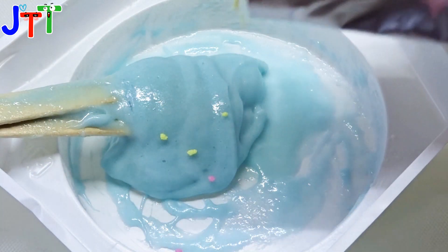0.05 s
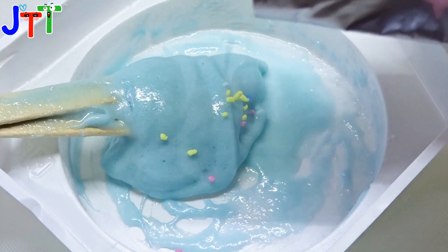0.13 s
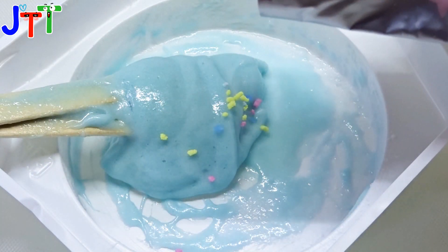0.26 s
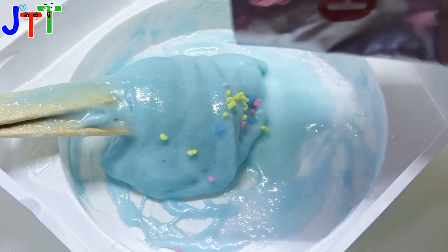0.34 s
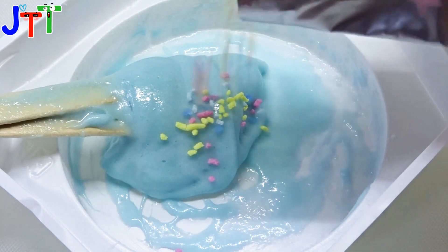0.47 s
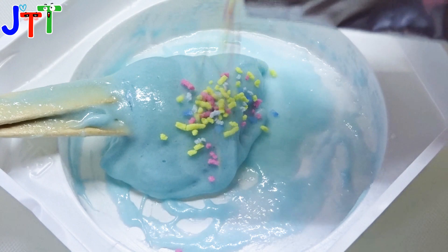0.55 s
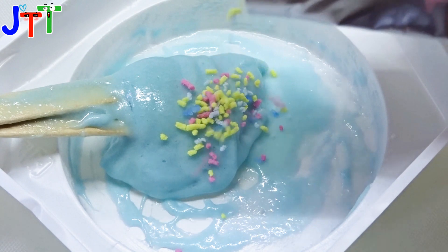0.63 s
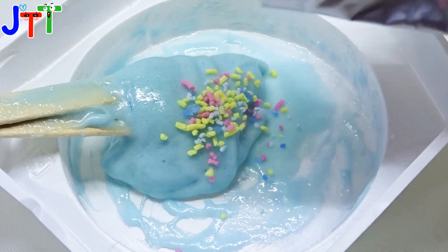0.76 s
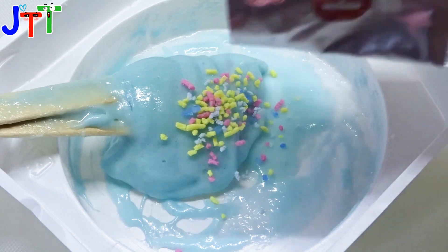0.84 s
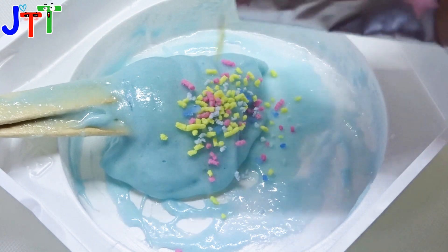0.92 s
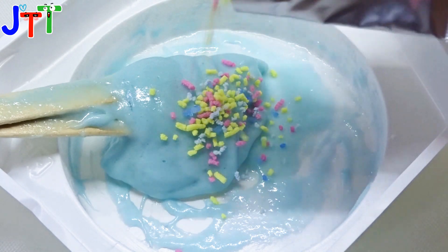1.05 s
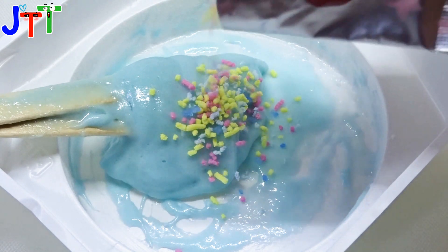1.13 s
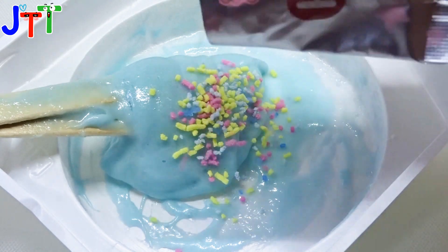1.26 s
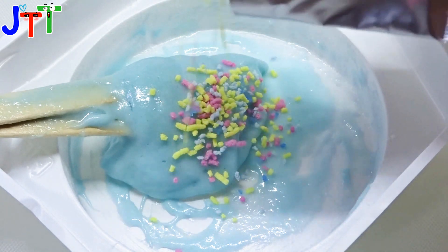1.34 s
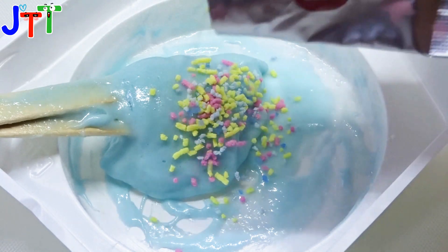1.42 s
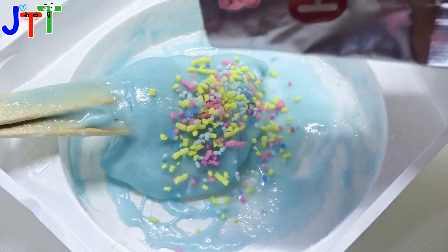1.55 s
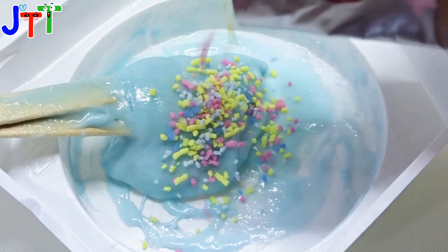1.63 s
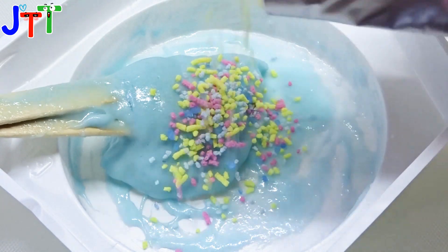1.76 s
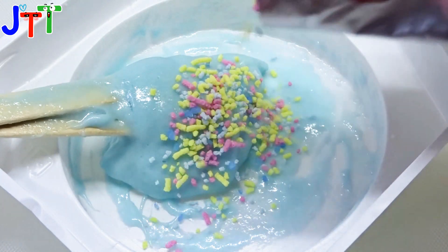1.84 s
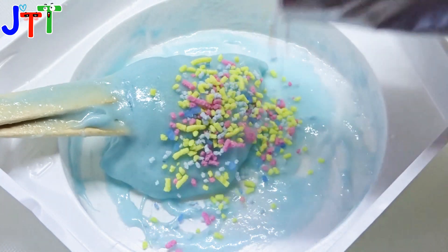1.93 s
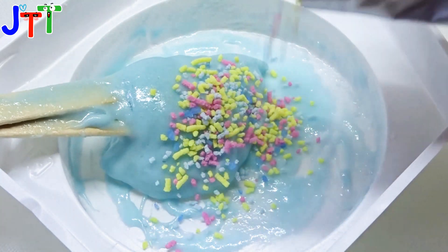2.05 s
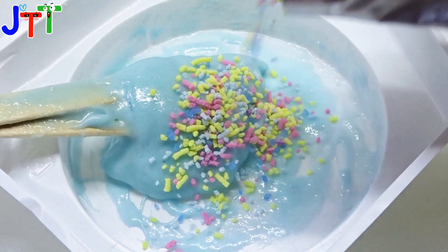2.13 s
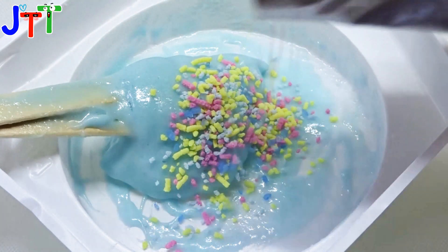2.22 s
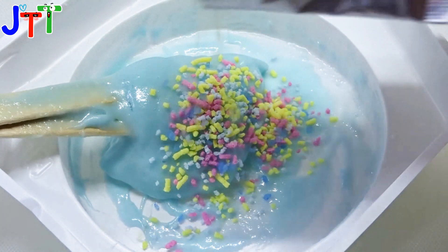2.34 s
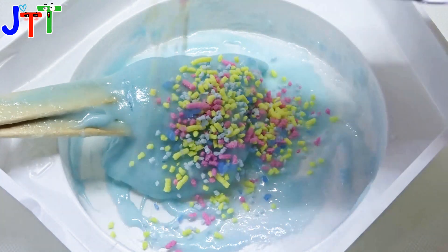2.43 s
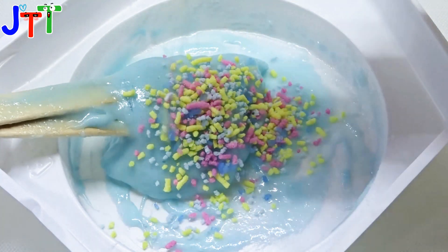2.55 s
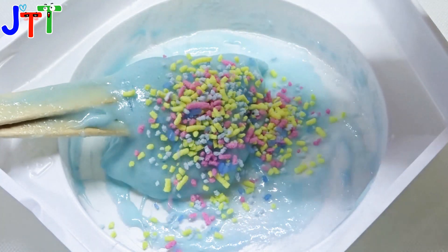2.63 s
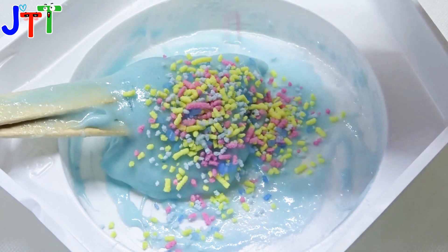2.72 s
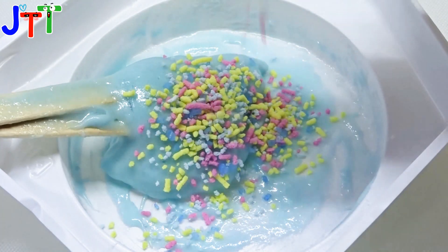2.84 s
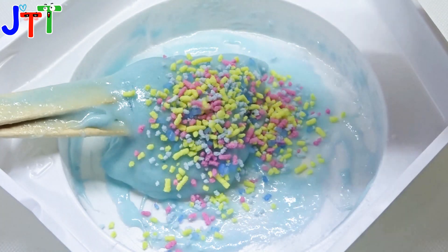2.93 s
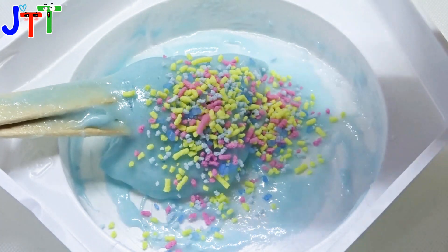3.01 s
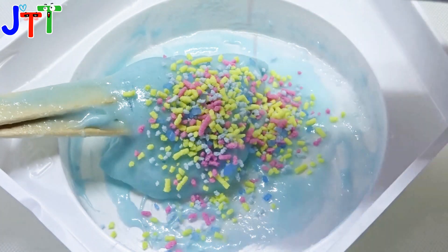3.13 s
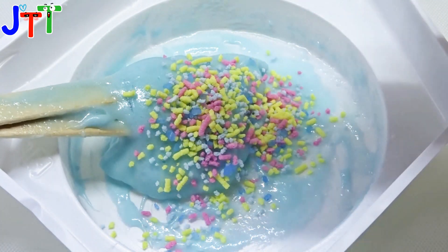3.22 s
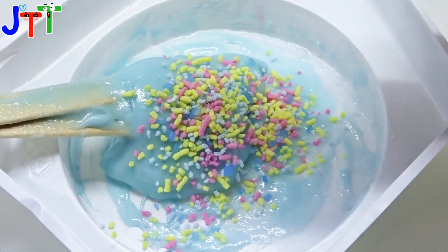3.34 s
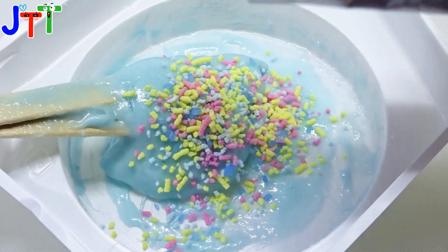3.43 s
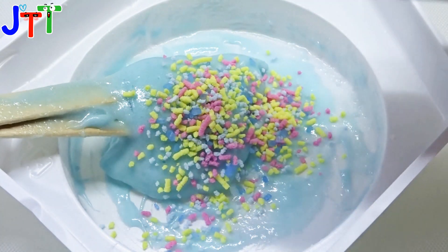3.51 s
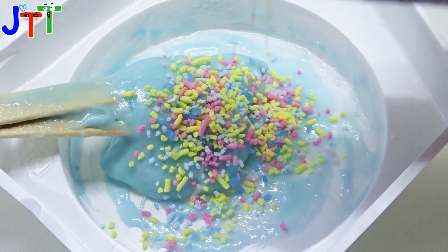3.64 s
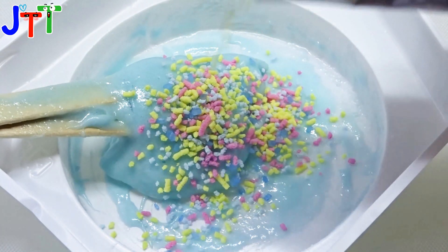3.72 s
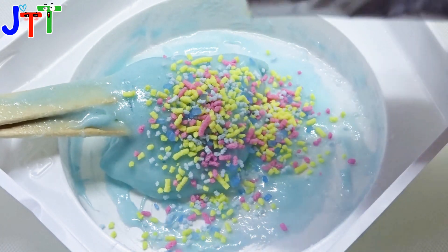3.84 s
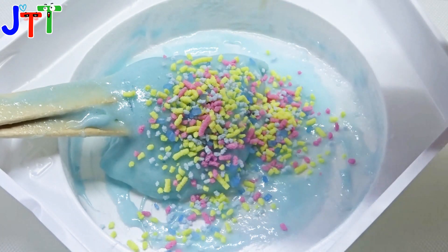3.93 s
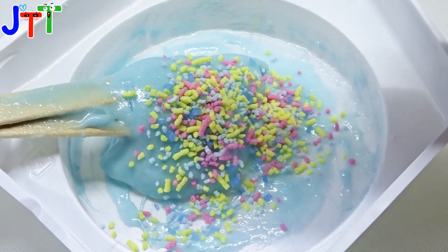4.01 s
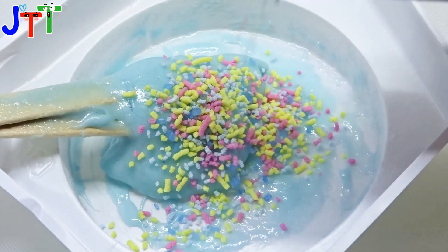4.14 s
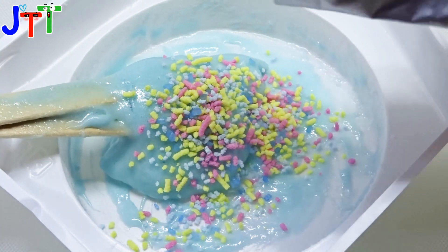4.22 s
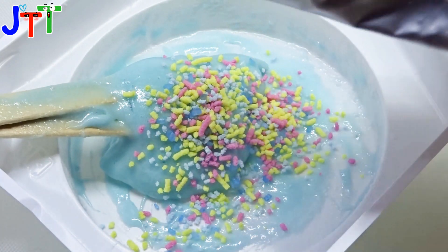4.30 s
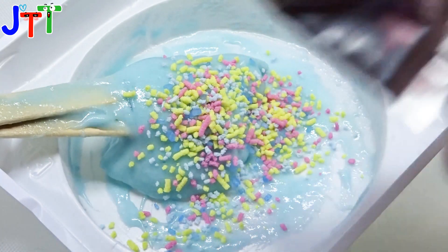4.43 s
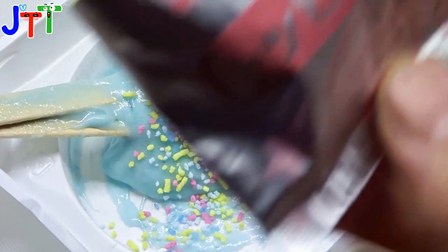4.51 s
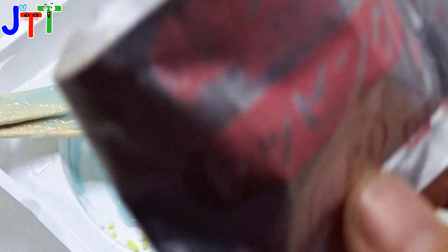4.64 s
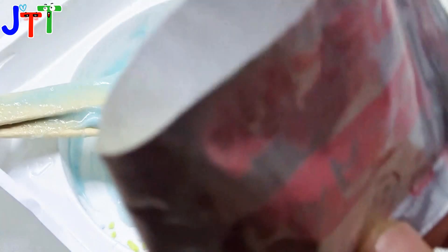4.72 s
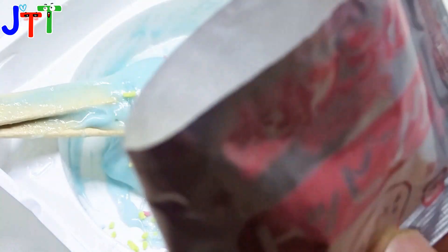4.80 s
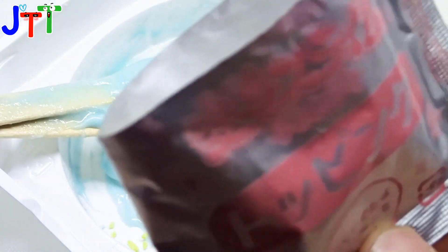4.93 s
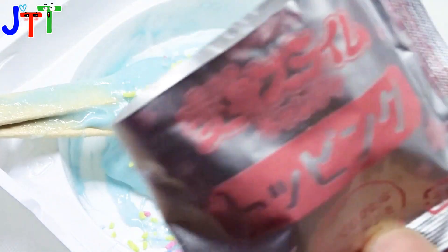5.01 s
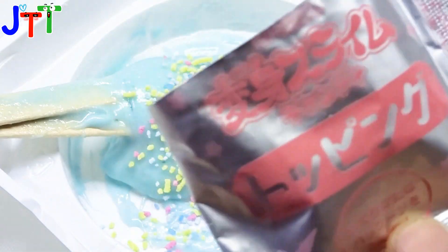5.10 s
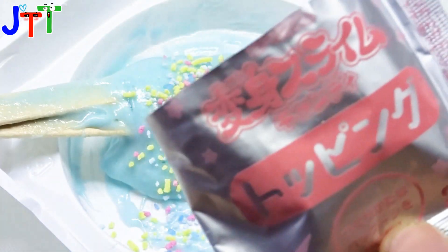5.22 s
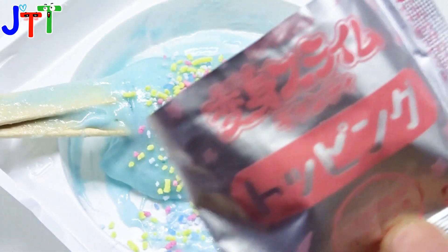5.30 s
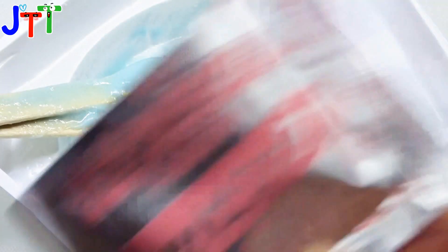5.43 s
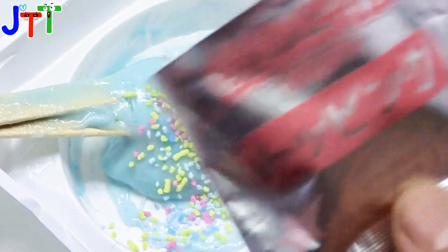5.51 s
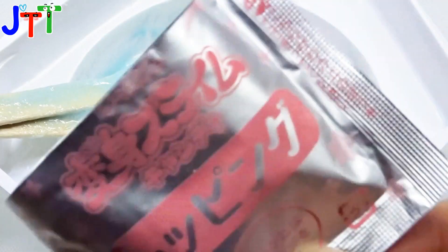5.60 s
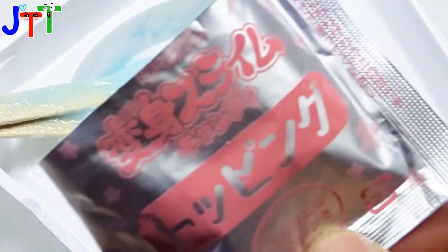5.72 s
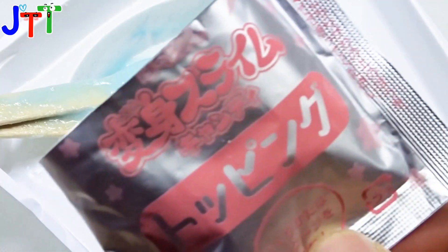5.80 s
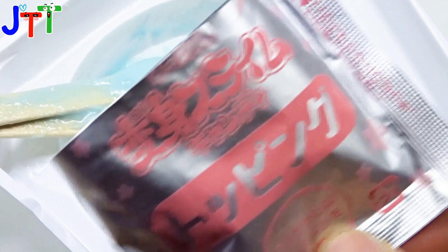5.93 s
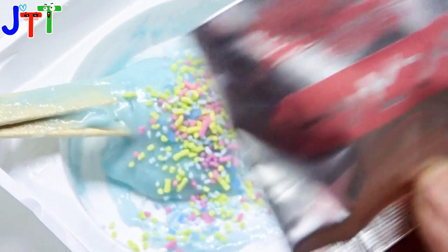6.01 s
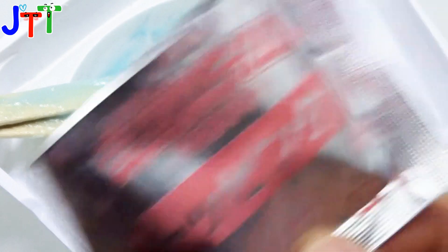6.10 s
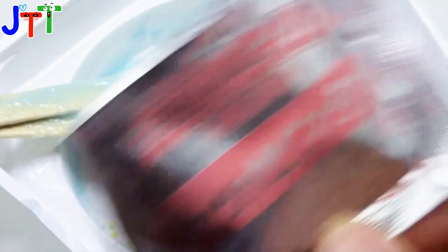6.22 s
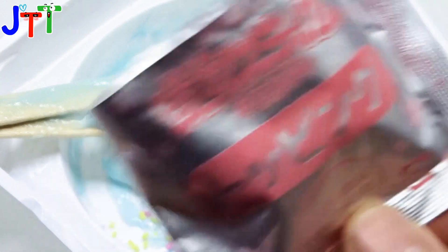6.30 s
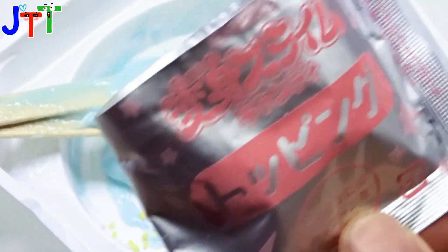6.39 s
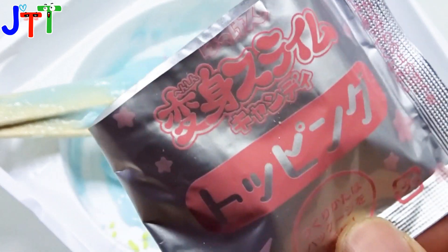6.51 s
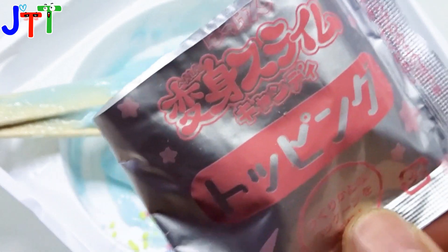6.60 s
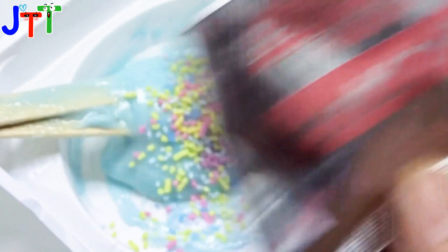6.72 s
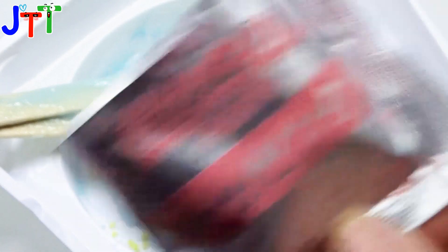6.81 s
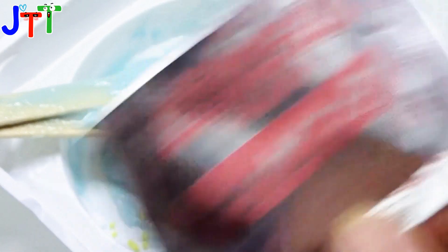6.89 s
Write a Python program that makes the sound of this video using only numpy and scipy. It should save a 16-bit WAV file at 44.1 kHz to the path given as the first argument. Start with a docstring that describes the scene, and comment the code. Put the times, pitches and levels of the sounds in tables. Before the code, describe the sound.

Fine dry grains hiss and patter over thin foil, jog after jog, dotted with tiny creasing snaps. Soft hand thuds come through the table as the packet is flipped and its contents slide. Then sharp rattling shakes burst out with short gaps between them, the last cut off at the end. Close, dry stereo, small room, faint low hum and air.

```python
"""Sugar sprinkles in a foil packet

A foil packet of sugar sprinkles is tipped over a tray close to a stereo microphone, turned over, then shaken.
Grains are random clicks through a bank of short modes, their level following each rush; creases snap as
fast-dying bands of noise. Dull noise puffs ring the table; a small room, a wavering hum and air lie below.
"""
import sys
import numpy as np
from scipy import signal
from scipy.fft import rfft, irfft, next_fast_len
from scipy.io import wavfile

SR = 44100
rng = np.random.default_rng(int(sys.argv[2]) if len(sys.argv) > 2 else 0)


def wav_out(sig):
    """Save sig, one row per channel (or a flat mono array), as 16-bit PCM at SR to the path in sys.argv[1]."""
    wavfile.write(sys.argv[1], SR, np.round(np.clip(np.atleast_2d(sig).T, -1, 1) * 32767).astype(np.int16))


N = 306578   # length in samples

POURING_S, TURNING_S, SHAKING_S = (0, 4.6), (4.4, 5.4), (5.4, 7)   # start and end of each stage


def pour():
    """Each jog of the tipped packet lets a rush of grains slide over the foil."""
    # Each row: peak time in seconds, relative level in dB, rise and fall in seconds for 10 dB.
    jogs = [(0.067, -53.0, 0.046, 0.056), (0.177, -35.5, 0.025, 0.066), (0.3, -45.0, 0.055, 0.041),
            (0.375, -54.5, 0.025, 0.138), (0.514, -35.0, 0.021, 0.074), (0.646, -44.5, 0.051, 0.043),
            (0.775, -52.5, 0.111, 0.052), (0.9, -53.0, 0.141, 0.019), (0.977, -38.0, 0.039, 0.112),
            (1.162, -44.5, 0.05, 0.065), (1.287, -48.0, 0.038, 0.1), (1.486, -43.0, 0.083, 0.04),
            (1.583, -43.0, 0.046, 0.085), (1.709, -41.5, 0.018, 0.101), (1.862, -42.5, 0.029, 0.127),
            (1.995, -43.0, 0.025, 0.092), (2.082, -54.5, 0.007, 0.15), (2.203, -42.5, 0.15, 0.033),
            (2.279, -43.5, 0.054, 0.09), (2.405, -46.0, 0.033, 0.137), (2.475, -46.0, 0.031, 0.021),
            (2.525, -42.0, 0.019, 0.136), (2.611, -44.5, 0.016, 0.023), (2.685, -48.5, 0.125, 0.143),
            (2.791, -48.5, 0.043, 0.105), (2.947, -49.5, 0.049, 0.046), (3.084, -52.5, 0.092, 0.048),
            (3.205, -49.0, 0.04, 0.078), (3.318, -45.5, 0.018, 0.114), (3.471, -50.5, 0.046, 0.027),
            (3.519, -45.0, 0.028, 0.023), (3.598, -46.5, 0.047, 0.104), (3.666, -46.0, 0.071, 0.012),
            (3.774, -52.5, 0.15, 0.061), (3.831, -53.0, 0.007, 0.15), (3.945, -54.0, 0.116, 0.022),
            (3.983, -42.0, 0.013, 0.124), (4.156, -50.5, 0.039, 0.15), (4.286, -40.5, 0.045, 0.052),
            (4.364, -54.0, 0.013, 0.077)]
    # Colour of the pouring grains. Each row: frequency in Hz, relative density in dB per Hz.
    colour = [(590, -55), (1000, -31), (1150, -15), (1730, -13.5), (2230, -5), (2800, -5.5), (3770, -3.5),
              (4280, -0.5), (5380, 2.5), (5820, -2.5), (7840, -2), (9740, -7), (13100, -11), (15400, -25)]
    # Brightness at full strength. Each row: time in seconds, tilt in dB per octave.
    tilt = [(0, -3.2), (.9, -3), (2, -1.6), (2.8, -1.6), (3.4, -2.4), (4.6, -2.1)]
    return grains(jogs, POURING_S, 1.4, colour, tilt, tilt_follows=.1,
                  per_s=5000, uneven_db=3.0, sharpness=12.2, patchy_db=2.5)


def turn_over():
    """The packet is turned over and the heap of grains slumps in stages."""
    # Each row: peak time in seconds, relative level in dB, rise and fall in seconds for 10 dB.
    slumps = [(4.578, -61.0, 0.085, 0.089), (4.608, -57.0, 0.011, 0.018), (4.688, -60.5, 0.015, 0.043),
              (4.746, -47.5, 0.016, 0.018), (4.819, -36.5, 0.038, 0.049), (4.871, -33.5, 0.015, 0.079),
              (4.93, -29.0, 0.02, 0.061), (5.015, -47.5, 0.018, 0.103), (5.132, -55.0, 0.016, 0.023),
              (5.208, -51.5, 0.017, 0.023)]
    # Colour of the slumping grains. Each row: frequency in Hz, relative density in dB per Hz.
    colour = [(500, -39), (850, -9), (2200, -7), (2600, -7), (3000, 0), (3500, -3.5), (5600, -0.5),
              (8000, -5), (10500, -8), (13500, -20), (15400, -34)]
    # Brightness at full strength. Each row: time in seconds, tilt in dB per octave.
    tilt = [(4.4, .2), (5.4, 1.2)]
    return grains(slumps, TURNING_S, 1.5, colour, tilt, tilt_follows=1.5,
                  per_s=5000, uneven_db=3.5, sharpness=13.4, patchy_db=2.01)


def shake():
    """Each stroke of a shake throws the grains against a wall of the packet."""
    # Each row: peak time in seconds, relative level in dB, rise and fall in seconds for 10 dB.
    strokes = [(5.558, -33.5, 0.02, 0.094), (5.622, -24.0, 0.02, 0.026), (5.707, -18.5, 0.029, 0.025),
               (5.759, -22.5, 0.023, 0.043), (5.792, -37.0, 0.016, 0.068), (5.856, -43.5, 0.132, 0.02),
               (6.21, -23.5, 0.02, 0.039), (6.283, -21.0, 0.023, 0.027), (6.302, -26.5, 0.016, 0.023),
               (6.372, -20.5, 0.031, 0.031), (6.419, -26.5, 0.02, 0.047), (6.503, -41.0, 0.051, 0.041),
               (6.893, -24.0, 0.02, 0.027), (6.95, -21.0, 0.021, 0.03)]
    # Colour of the shaken grains. Each row: frequency in Hz, relative density in dB per Hz.
    colour = [(300, -34.5), (500, -23), (800, -19), (1250, -10.5), (2400, -6), (3300, -8), (4000, -1.5),
              (4600, -1), (5600, -4.5), (8000, -7.5), (10800, -12.5), (13300, -20.5), (15400, -36)]
    # Brightness at full strength. Each row: time in seconds, tilt in dB per octave.
    tilt = [(5.4, 1.1), (7, .3)]
    return grains(strokes, SHAKING_S, 1.7, colour, tilt, tilt_follows=.6,
                  per_s=9000, uneven_db=3.0, sharpness=11, patchy_db=1.5)


def grains(rows, span, rounding, colour, tilt, tilt_follows, per_s, uneven_db, sharpness, patchy_db):
    """Random impacts strike all the short modes of the foil anew; harder rushes sound brighter."""
    first, last = round(span[0] * SR), min(round(span[1] * SR), N)
    at = np.flatnonzero(rng.random(last - first) < per_s / SR)
    times = (first + at) / SR
    level = rushes(rows, times, rounding)
    brightness = np.interp(times, *np.transpose(tilt))   # dB per octave
    brightness += tilt_follows * np.log10(level / level.max() + .001)
    sizes = from_db(uneven_db * np.minimum(rng.exponential(1, len(at)), 5))
    sizes = rms_one(sizes) * np.sqrt(SR / per_s)
    # the wall flexes, so its modes swell and fade
    flexes = [wander(25, size=last - first)[at] for _ in range(6)]
    out, power = np.zeros((2, N)), 0
    for k, hz in enumerate(np.geomspace(300, 15000, 36)):
        gain, width = from_db(at_hz(colour, hz)), hz / sharpness
        strength = sizes * level * from_db(brightness * np.log2(hz / 5000))
        strength *= from_db(patchy_db * flexes[k % len(flexes)])
        clicks = np.zeros((2, last - first))
        clicks[:, at] = sides(strength * rng.standard_normal(len(at)), hz)
        # two filters in a row: steep skirts keep the bass clear
        ringing = resonate(resonate(clicks, hz, width), hz, 2 * width)
        out[:, first:last] += gain * ringing
        power += gain ** 2 * 2 * width / SR
    return out / np.sqrt(power)


def rushes(rows, t, rounding):
    """Each rush swells to a rounded top and dies away ever faster; their powers add."""
    power = 0
    for peak_s, db, rise, fall in rows:
        distance = np.where(t < peak_s, (peak_s - t) / rise, (t - peak_s) / fall)
        power = power + from_db(2 * (db - 10 * distance ** rounding))
    return np.sqrt(power)


def sides(values, hz):
    """Each impact reaches the two channels with its own strengths, the more so the higher the pitch."""
    # Left-right scatter of an impact. Each row: frequency in Hz, scatter as a fraction of its strength.
    spread = [(700, .05), (2000, .12), (4000, 0.24), (8000, 0.5), (14000, .6)]
    # Pull to the left. Each row: frequency in Hz, dB added on the left and taken off on the right.
    lean_db = [(1000, -0.1), (3000, .45), (9000, 0.8)]
    scatter = at_hz(spread, hz) * rng.standard_normal(np.shape(values))
    lean = from_db(at_hz(lean_db, hz))
    return np.array([values * (1 + scatter) * lean, values * (1 - scatter) / lean])


def cracks():
    """Creases and single grains, from loud cracks to faint loose grains after a shake, plus random ticks."""
    # Each row: start in seconds, relative peak level in dB, centre in Hz, time to fall 60 dB in seconds.
    timed_cracks = [(.1027, -33.5, 5160, .02), (.253, -32, 3970, .014), (.373, -34.5, 4570, .02),
                    (.3916, -32, 3780, .009), (.624, -32, 5100, .02), (.7774, -32.5, 5330, .011),
                    (.8617, -32, 5340, .014), (.873, -31, 5570, .011), (.8847, -33, 4730, .015),
                    (.932, -38, 1050, .03), (.933, -28, 4200, .015), (.9456, -30, 5440, .0075),
                    (.961, -23.5, 2700, .013), (.9647, -19, 5160, .026), (1.0277, -25, 5400, .02),
                    (1.122, -31.5, 4970, .012), (1.2737, -32, 5320, .015), (1.344, -33.5, 4950, .013),
                    (1.3852, -29.5, 5860, .015), (1.7035, -18, 5990, .015), (1.715, -25, 6780, .022),
                    (1.7774, -26.5, 5500, .015), (1.9225, -28.5, 6520, .02), (1.9427, -25.5, 6500, .011),
                    (1.9708, -22, 6360, .024), (2.08, -32, 4190, .021), (2.1923, -23, 5550, .013),
                    (2.2735, -27, 4970, .015), (2.3365, -29.5, 4460, .02), (2.3842, -30, 5470, .009),
                    (2.5199, -19, 6910, .045), (2.606, -24, 6000, .015), (2.615, -24, 5700, .018),
                    (2.6379, -30, 5840, .016), (2.6716, -31, 5110, .015), (2.6813, -29.5, 4780, .016),
                    (2.7345, -31, 4660, .015), (2.7909, -26, 5400, .022), (2.969, -26, 5840, .032),
                    (3.3017, -34, 6400, .015), (3.401, -33.5, 5080, .015), (3.4615, -31.5, 4900, .015),
                    (3.474, -32, 4400, .012), (3.514, -27.5, 4300, .029), (3.57, -30, 5370, .017),
                    (3.5966, -32, 4770, .018), (3.633, -23.5, 5860, .013), (3.6697, -25, 4940, .01),
                    (3.732, -33, 4670, .015), (3.7751, -33, 5270, .015), (3.8273, -30.5, 5730, .01),
                    (3.8825, -31.5, 6090, .021), (3.9038, -30, 5780, .01), (3.9256, -32, 5440, .015),
                    (3.972, -26.5, 6340, .018), (3.982, -19.5, 5820, .015), (3.996, -18.5, 6430, .025),
                    (4.032, -28, 5950, .017), (4.0649, -26.5, 4800, .012), (4.164, -29, 5670, .019),
                    (4.1696, -24, 5170, .014), (4.1914, -29, 4930, .021), (4.276, -28, 4800, .022),
                    (4.284, -35, 1600, .025), (4.2884, -25, 5950, .015), (4.3068, -21, 5100, .016),
                    (4.3677, -31, 5500, .019), (4.605, -30, 2050, .025), (4.7353, -38, 3580, .039),
                    (4.8155, -19.5, 4700, .022), (4.8661, -18, 4700, .017), (4.9295, -13, 7100, .023),
                    (5.042, -27.5, 5640, .008), (5.084, -26, 3600, .019), (5.2124, -31.5, 6650, .017),
                    (5.5789, -22, 5180, .008), (5.613, -14, 5760, .012), (5.6235, -10, 4670, .016),
                    (5.691, -10, 4930, .007), (5.7107, -8, 5160, .006), (5.7164, -8.5, 4700, .015),
                    (5.83, -14, 6860, .015), (5.8448, -23, 5940, .008), (5.866, -23, 5900, .006),
                    (5.893, -47, 6500, .01), (5.929, -46, 6000, .012), (5.952, -49, 5500, .012),
                    (6.1874, -17, 4750, .007), (6.218, -12, 5270, .008), (6.2469, -18, 4610, .009),
                    (6.309, -8, 6060, .011), (6.349, -12, 4500, .016), (6.3767, -6, 5070, .006),
                    (6.49, -24, 4700, .009), (6.5071, -21, 5120, .0095), (6.5342, -32, 4190, .008),
                    (6.8666, -24, 4480, .0065), (6.882, -16, 4870, .008), (6.8943, -14, 4810, .008)]
    return snaps(list(timed_cracks) + ticks(), below=1.66, above=1.38, tick_db=2.5, tick_s=0.00024)


def ticks():
    """Rows of faint snaps, laid out like the cracks, at random moments of the pouring."""
    per_s, level_db, scatter_db, centre_hz, t60_s = 9, -39, 2.5, 4900, .014
    end_s = POURING_S[1] - .3
    draws = rng.random((round(per_s * end_s), 3))
    return [(when * end_s, level_db + scatter_db * (2 * size - 1), centre_hz * 2 ** (.6 * pitch - .3), t60_s)
            for when, size, pitch in draws]


def snaps(rows, below, above, tick_db, tick_s):
    """A crease gives way: a hard tick, then a crack of noise around its own pitch that dies fast."""
    octaves = .47   # scales the spread below and above the centre
    out, t = np.zeros((2, N + 2500)), np.arange(2500) / SR
    for start_s, peak_db, hz, t60 in rows:
        low, high = hz / 2 ** (below * octaves), hz * 2 ** (above * octaves)
        band = signal.butter(2, [low, min(high, .45 * SR)], "band", fs=SR, output="sos")
        fall = from_db(-60 * t / max(t60, .003))
        fall += from_db(tick_db) * np.exp(-t / tick_s)
        crack = signal.sosfilt(band, sides(rng.standard_normal(len(t)), hz) * fall)
        at = round(start_s * SR)
        out[:, at:at + len(t)] += from_db(peak_db) * crack / np.max(np.abs(crack.mean(0)))
    return out[:, :N]


def foil(x):
    """The foil walls ring on briefly after the poured grains and after every crack."""
    # Wall modes. Each row: frequency in Hz, width in Hz, level in dB against the direct sound.
    wall_modes = [(2215, 150, -7.5), (2990, 40, -2.5), (4200, 250, -9), (5260, 190, -3.5), (6870, 110, -3),
                  (7870, 350, -9.5)]
    return x + sum(from_db(db) * resonate(x, hz, width) for hz, width, db in wall_modes)


def pocket(x):
    """While the packet gapes open, the air inside sings along; it fades as the packet is pressed flat."""
    hz, width_hz, level_db, closed_s, fade_s = 3010, 230, 4, 4.9, .06
    gape = np.clip((closed_s - np.arange(N) / SR) / fade_s, 0, 1)
    return x + from_db(level_db) * resonate(gape * x, hz, width_hz)


def thuds(rise_s):
    """Soft blows: a dull puff of noise that dies away in the broad modes of the table."""
    # Dull bumps of the hand through the table.
    # Each row: start in seconds, peak level in dB, top of the puff in Hz, puff's 60 dB fall in seconds.
    bumps = [(4.278, -37.5, 885, 0.065), (4.28, -48, 150, .09), (4.645, -39.5, 450, .2),
             (4.678, -34, 716, .2), (4.709, -37.5, 600, 0.22), (4.75, -44, 500, .3),
             (5.096, -38, 805, 0.17), (5.139, -45.5, 500, .3), (5.385, -41, 453, 0.27),
             (5.44, -46.5, 400, 0.21)]
    # Modes of the table. Each row: frequency in Hz, width in Hz, relative level in dB.
    table_modes = [(95, 46, -7.5), (194, 33, -1.5), (247, 73, 0.5), (290, 23, -6.5), (462, 100, -3.5),
                   (584, 120, -4.5), (825, 83, -6.5)]
    out, t = np.zeros(N + 20000), np.arange(20000) / SR
    for start_s, peak_db, top_hz, t60 in bumps:
        band = signal.butter(2, [100, top_hz], "band", fs=SR, output="sos")
        puff = rng.standard_normal(len(t)) * (1 - np.exp(-t / rise_s)) * from_db(-60 * t / t60)
        puff = signal.sosfilt(band, puff)
        body = sum(from_db(db) * resonate(puff, hz, width) for hz, width, db in table_modes)
        at = round(start_s * SR)
        out[at:at + len(t)] += from_db(peak_db) * body / np.max(np.abs(body))
    return out[:N]


def room(x):
    """Reverb tail from eight feedback delays a side, duller on every round."""
    t60_s, wall_cut_hz = 0.4, 9200   # t60 of the bass: the walls shorten the treble
    size = next_fast_len(N + SR)
    turn = 2j * np.pi * np.arange(size // 2 + 1) / size
    dull = np.exp(-2 * np.pi * wall_cut_hz / SR)
    wall = (1 - dull) / (1 - dull * np.exp(-turn))
    tails = np.zeros((2, len(turn)), complex)
    for k, lag in enumerate(rng.uniform(0.0036, .03, 16) * SR):   # lag in samples
        loop = from_db(-60 * lag / SR / t60_s) * wall * np.exp(-turn * round(lag))
        tails[k % 2] += loop / (1 - loop) * (-1) ** (k // 2)
    return irfft(tails * rfft(x, size), size)[:, :N]


def hum(rate, waver_db):
    """Low sine tones that waver in pitch and level."""
    # Each row: centre pitch in Hz, pitch wander in Hz, level in dB around which the tone wavers.
    tones = [(139.4, 4.24, -77), (243, 4.41, -61), (329.5, 3, -66)]
    out = np.zeros(N)
    for hz, wander_hz, db in tones:
        level = np.sqrt(2) * from_db(db + waver_db * wander(rate))
        phase = 2 * np.pi * np.cumsum(hz + wander_hz * wander(rate)) / SR
        out += level * np.sin(phase)
    return out


def air():
    """Steady room noise, alike in both channels in the bass, unrelated in the treble."""
    # Colour of the air. Each row: frequency in Hz, relative density in dB per Hz.
    air_colour = [(25, -24), (50, -21), (110, -14.5), (200, -5.5), (300, -7), (450, -12), (900, -17),
                  (1200, -18.5), (1800, -21.5), (4000, -27.5), (10000, -30.5), (13500, -41), (15500, -49)]
    # Likeness of left and right. Each row: frequency in Hz, likeness from 0 to 1.
    likeness = [(30, 0.95), (60, .92), (150, .97), (300, 0.89), (600, 0.61), (1400, 0.13), (4000, .05)]
    hz = np.maximum(np.arange(N // 2 + 1) * SR / N, 1)
    mid, side = rfft(rng.standard_normal((2, N))) * from_db(at_hz(air_colour, hz))
    alike = np.clip(at_hz(likeness, hz), 0, 1)
    mid, side = mid * np.sqrt(1 + alike), side * np.sqrt(1 - alike)
    return from_db(-58) * rms_one(irfft(np.array([mid + side, mid - side]), N))


def resonate(x, hz, width):
    """One mode: a two-pole band-pass of gain 1 at its top, ringing longer the narrower it is."""
    r = np.exp(-np.pi * width / SR)
    top = (1 - r * r) / 2 * np.array([1, 0, -1])
    return signal.lfilter(top, [1, -2 * r * np.cos(2 * np.pi * hz / SR), r * r], x + 1e-18)


def wander(rate, size=N):
    """Slow random drift of spread 1: noise through two low-passes at rate in Hz."""
    r = np.exp(-2 * np.pi * rate / SR)
    drift = signal.lfilter([1], [1, -2 * r, r * r], rng.standard_normal(size + SR // 4))
    return rms_one(drift[SR // 4:])   # the filter's start is dropped


def from_db(db):
    """Decibels to gain."""
    return 10 ** (np.asarray(db) / 20)


def rms_one(x):
    """Scaled to rms 1."""
    return x / np.sqrt(np.mean(x ** 2) + 1e-20)


def at_hz(points, hz):
    """Reads a table on a log-frequency axis."""
    points = np.array(points)
    return np.interp(np.log(hz), np.log(points[:, 0]), points[:, 1])


def scene():
    """Packet and table in a small room, over hum and air."""
    poured_and_cracks = from_db(-3.0) * foil(pour() + cracks())
    packet = poured_and_cracks + pocket(turn_over()) + shake()
    near = packet + thuds(rise_s=.003)
    reverb = from_db(-28.5) * room(near.mean(0))
    return near + reverb + hum(rate=8.02, waver_db=2.5) + air()


def record(dry):
    """A steep low-pass removes the top, 60 dB down from 15.8 kHz."""
    return signal.sosfilt(signal.cheby2(16, 60, 15800, fs=SR, output="sos"), dry)


dry = scene()
out = record(dry)
wav_out(out)
```